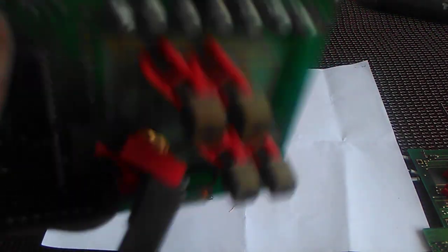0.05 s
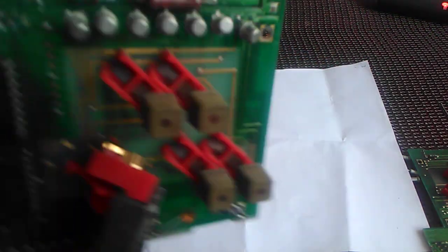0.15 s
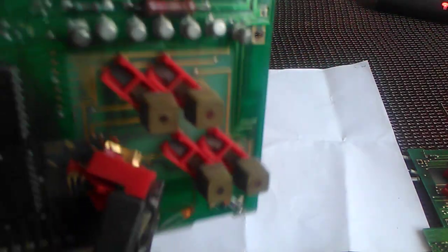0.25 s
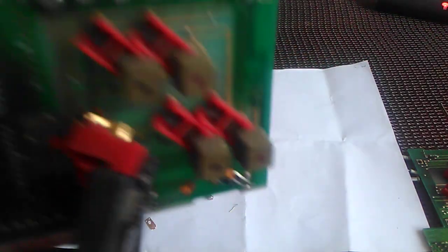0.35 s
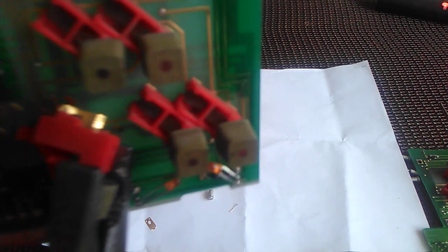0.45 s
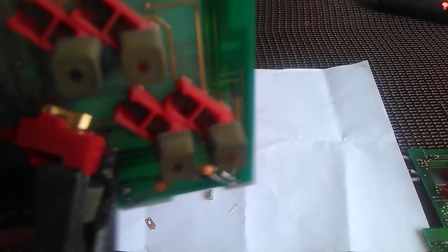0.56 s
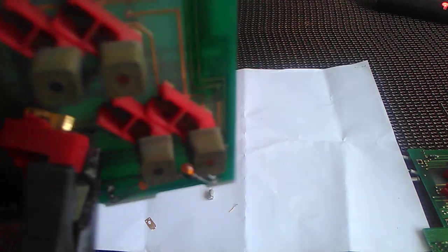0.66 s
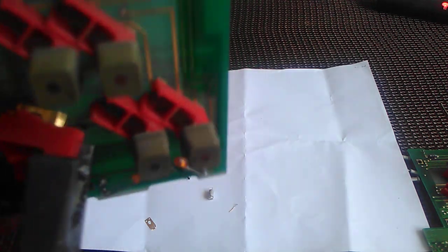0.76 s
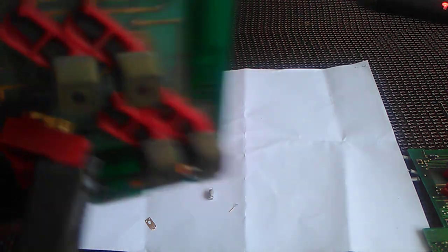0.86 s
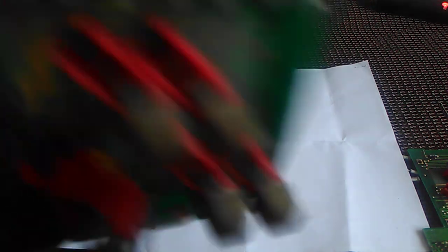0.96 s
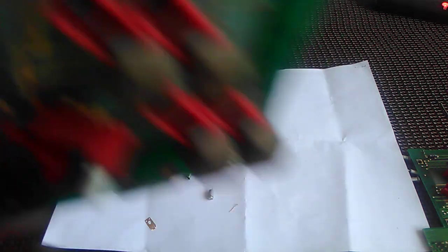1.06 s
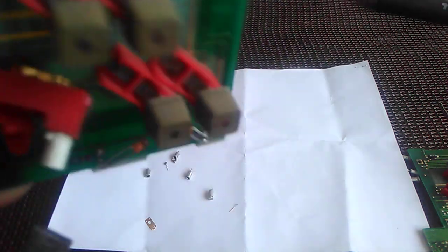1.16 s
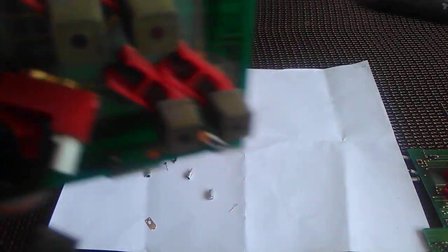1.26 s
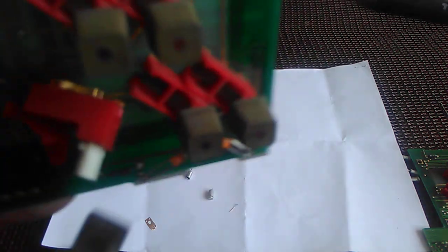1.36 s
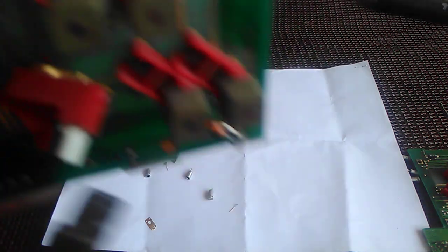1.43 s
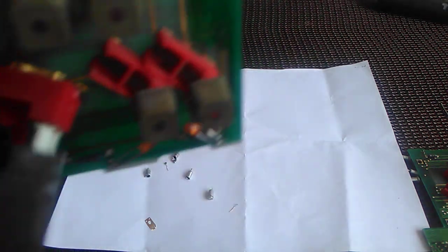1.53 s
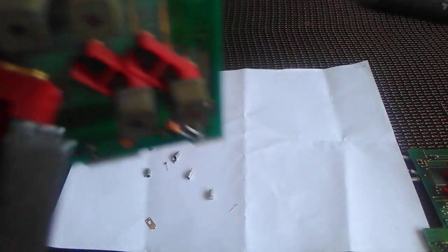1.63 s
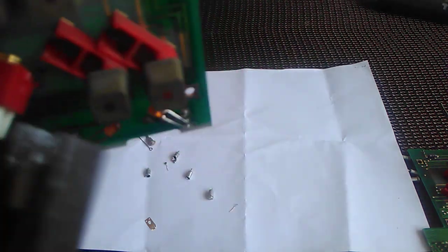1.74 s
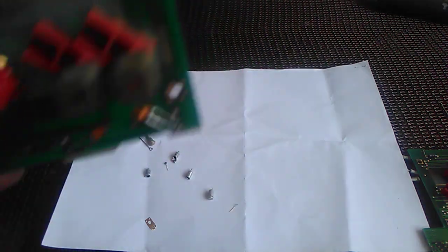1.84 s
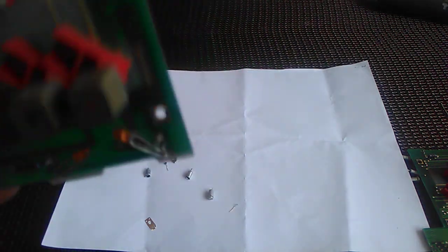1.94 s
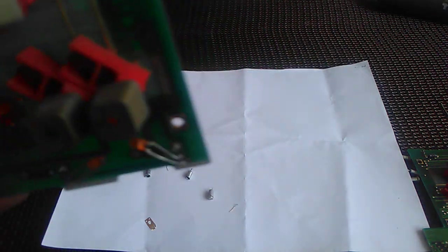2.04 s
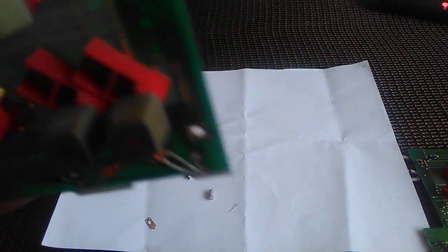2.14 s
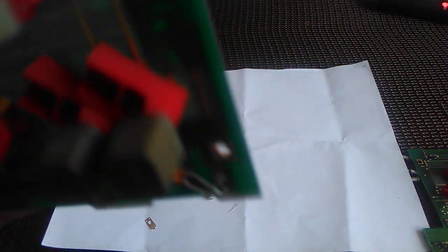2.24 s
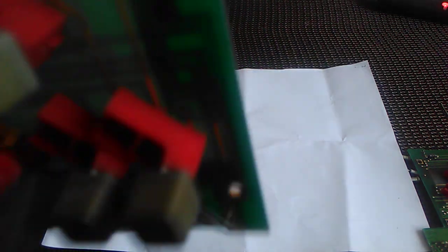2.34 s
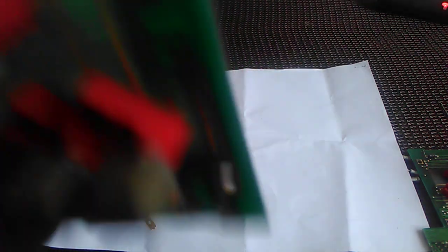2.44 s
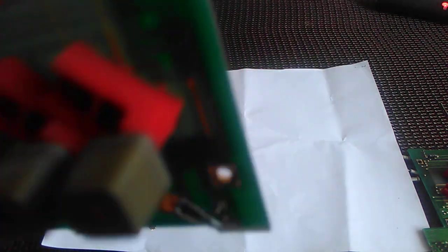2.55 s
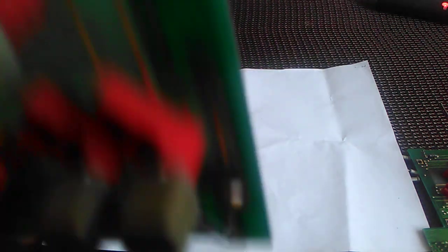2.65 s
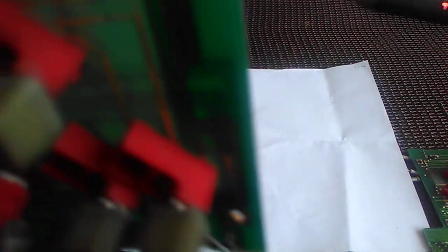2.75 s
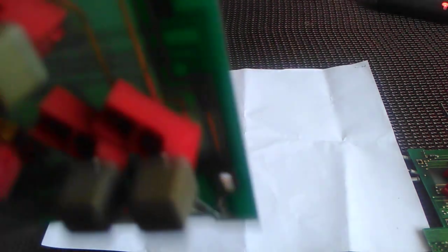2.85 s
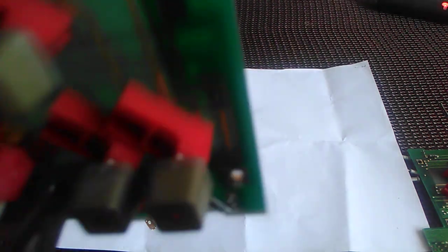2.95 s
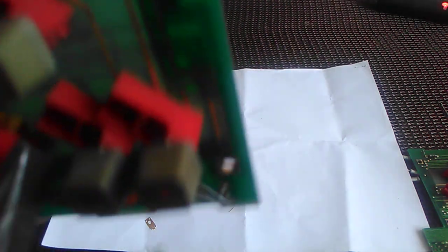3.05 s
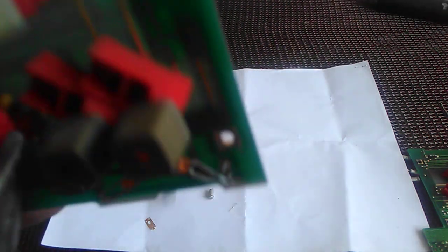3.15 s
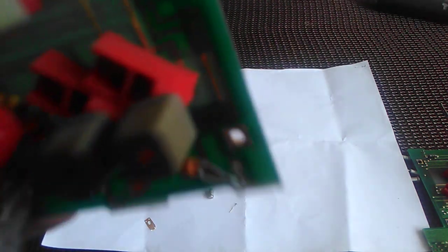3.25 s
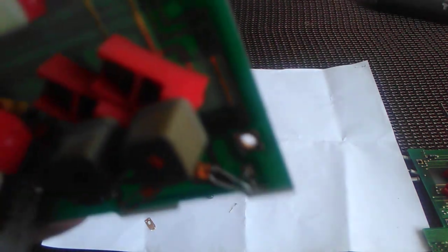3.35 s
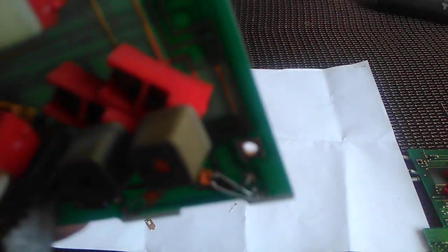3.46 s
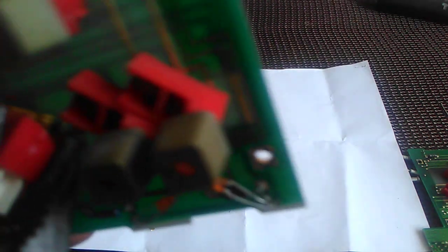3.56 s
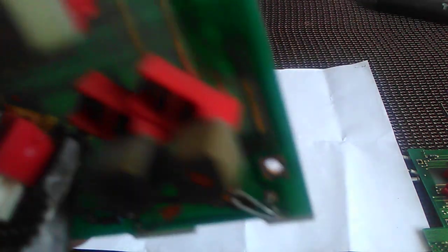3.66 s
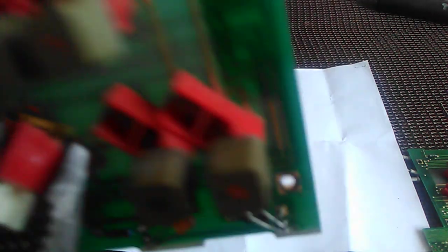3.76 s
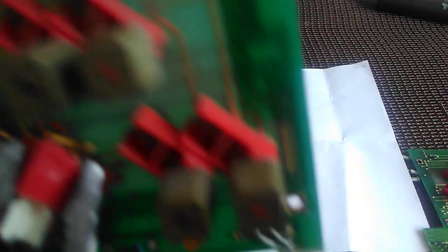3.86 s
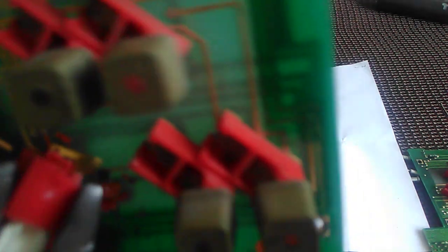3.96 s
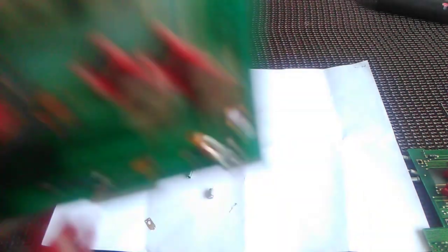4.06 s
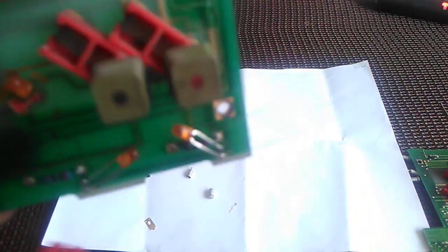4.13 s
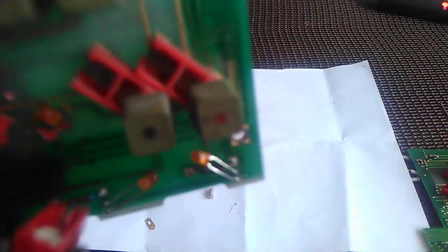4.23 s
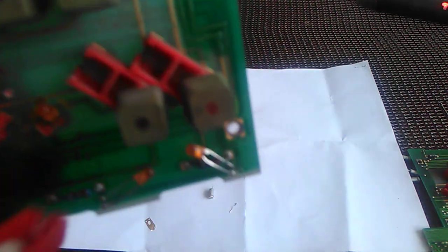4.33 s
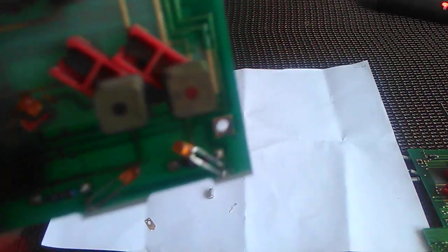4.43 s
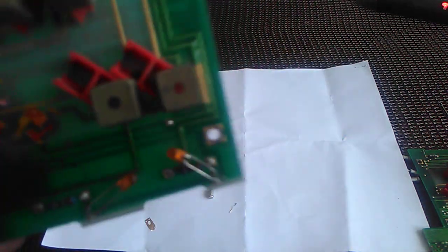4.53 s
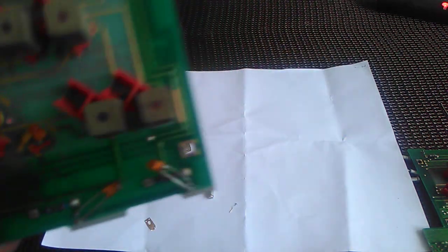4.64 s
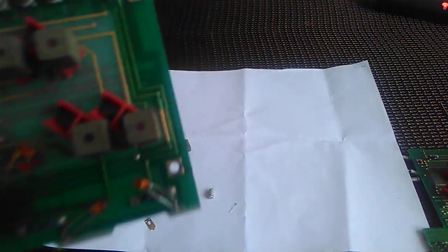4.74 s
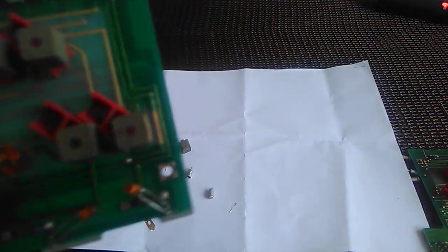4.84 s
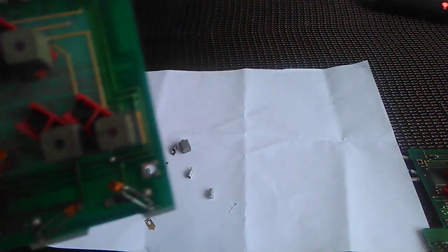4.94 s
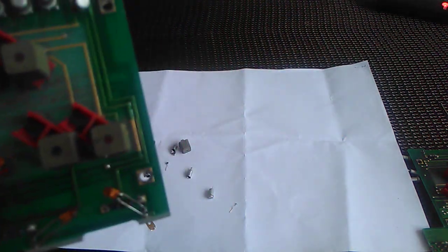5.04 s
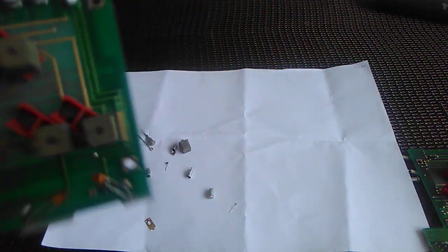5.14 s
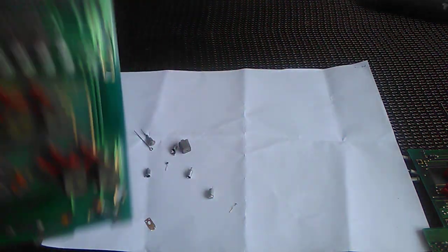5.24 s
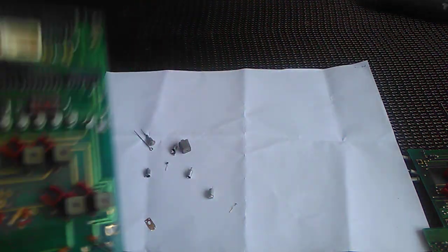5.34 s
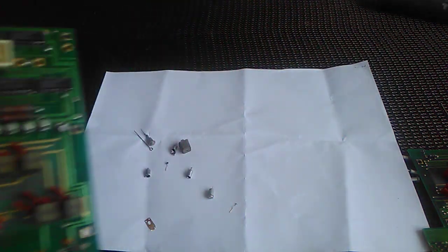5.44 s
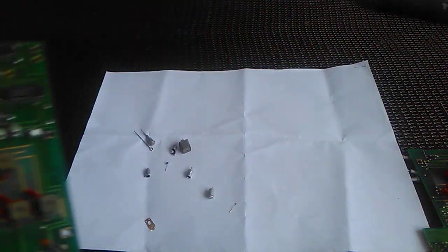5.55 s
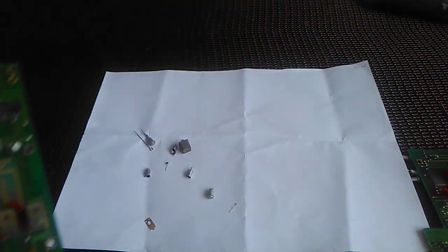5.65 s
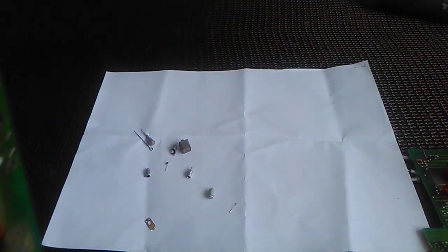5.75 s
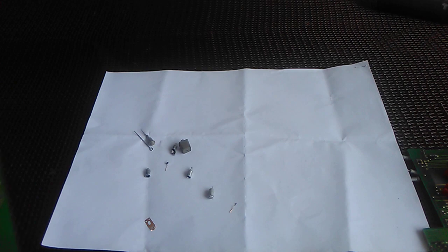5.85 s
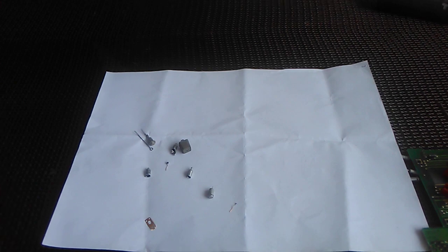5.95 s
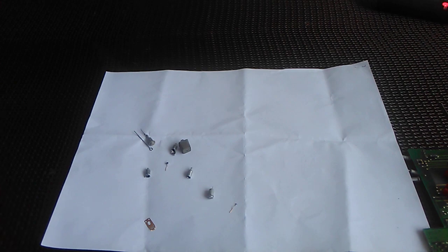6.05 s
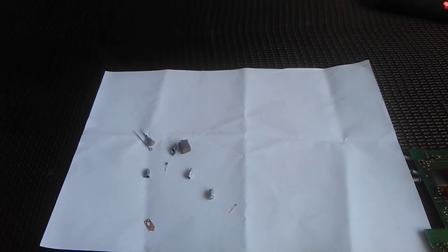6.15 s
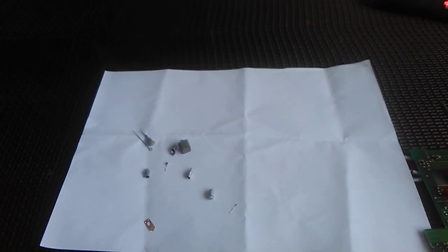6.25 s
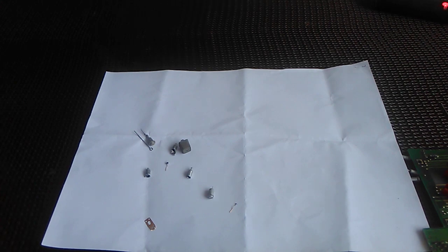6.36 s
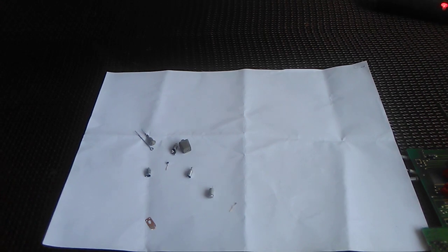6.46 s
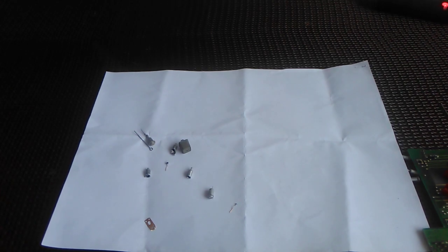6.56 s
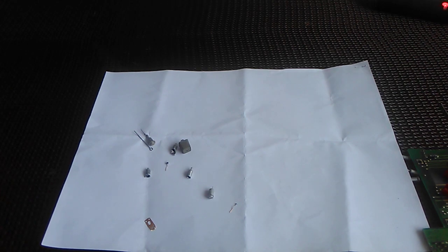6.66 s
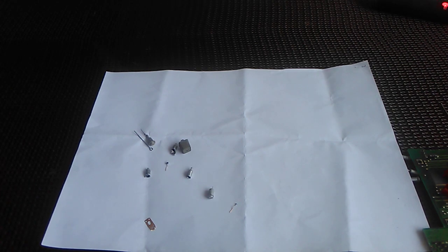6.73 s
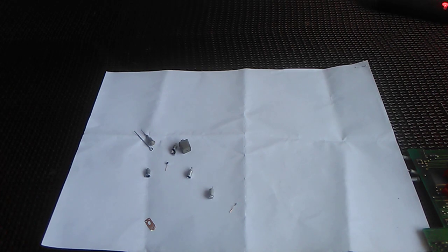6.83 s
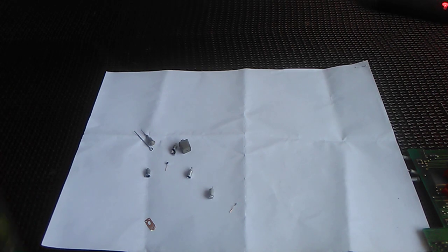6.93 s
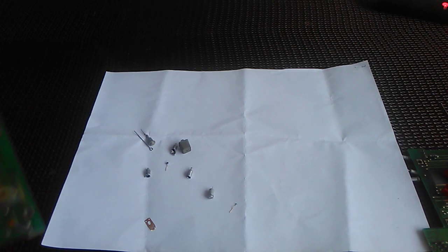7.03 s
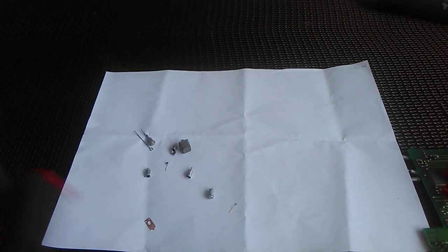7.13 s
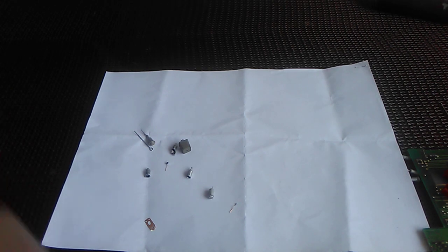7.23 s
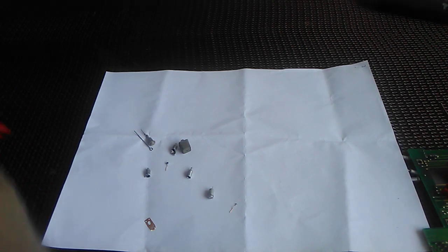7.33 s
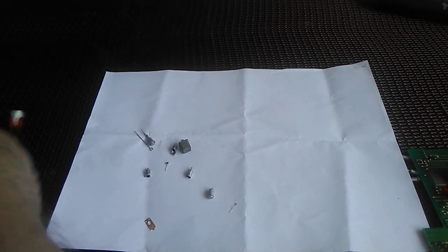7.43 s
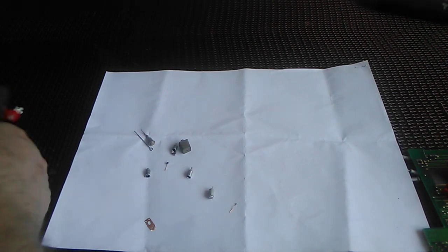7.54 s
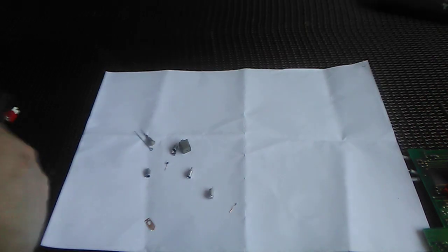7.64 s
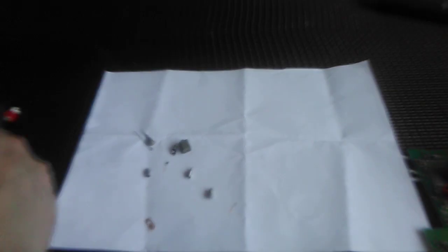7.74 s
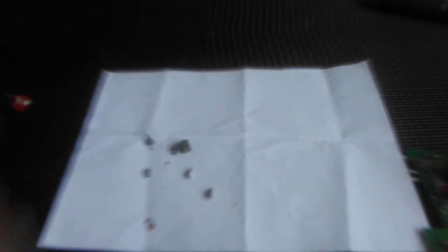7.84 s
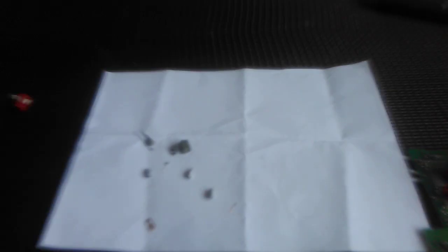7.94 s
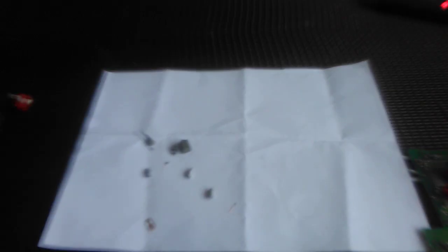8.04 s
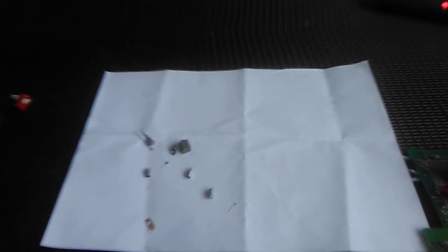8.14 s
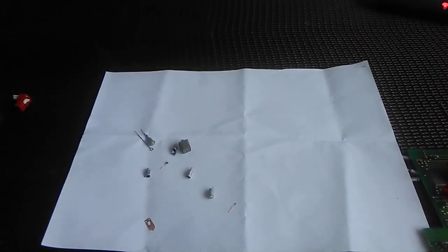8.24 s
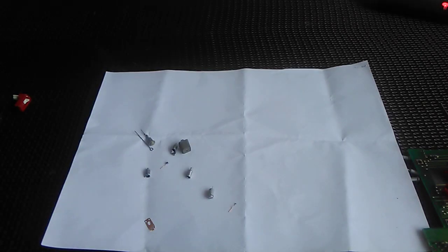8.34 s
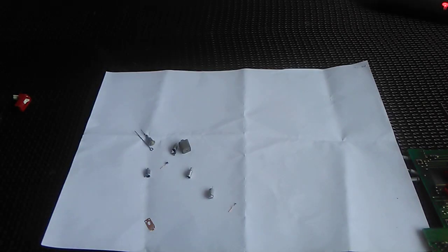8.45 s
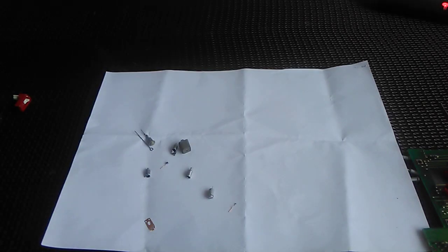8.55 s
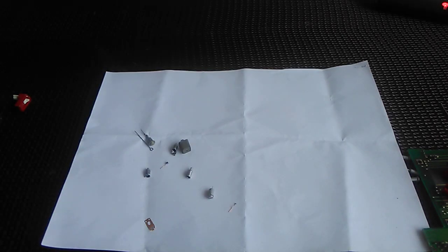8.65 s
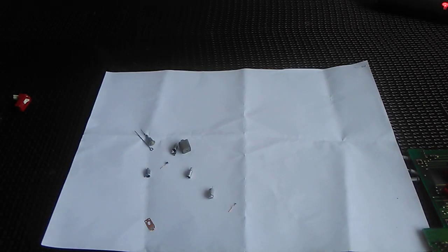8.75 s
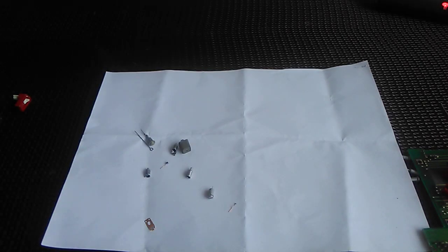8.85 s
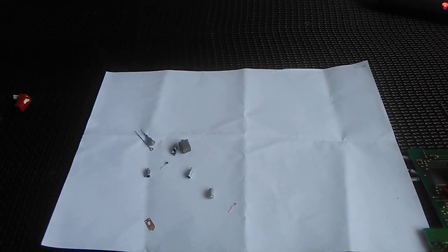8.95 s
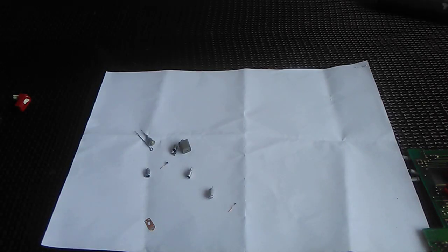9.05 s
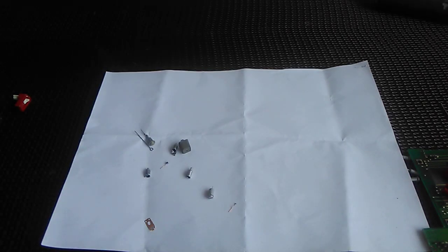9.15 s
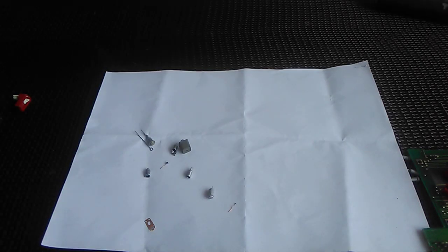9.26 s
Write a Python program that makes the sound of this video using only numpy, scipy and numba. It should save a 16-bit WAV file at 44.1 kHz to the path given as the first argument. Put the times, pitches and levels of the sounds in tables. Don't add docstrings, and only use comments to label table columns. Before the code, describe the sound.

Irregular hard snaps of breaking plastic, slightly overloaded and bright, come with gritty crunching, brief metal squeals and ringing small parts for over four seconds. A quieter spell of soft rubbing and light bumps follows. Then a circuit board lands with sharp clacks, deep hollow table knocks and loose chatter, and the small room falls nearly silent, heard close on a phone.

```python
import sys
import numpy as np
from scipy import signal
from scipy.fft import rfft, irfft
from scipy.io import wavfile
from scipy.ndimage import uniform_filter1d
from numba import njit

SR = 44100
rng = np.random.default_rng(int(sys.argv[2]) if len(sys.argv) > 2 else 0)


def elevation(decibels):
    levels = np.asarray(decibels, float)
    return 10 ** (levels / 20)


def to_wav(s):
    ch = np.atleast_2d(s).T
    pcm = np.round(np.clip(ch, -1, 1) * 32767)
    wavfile.write(sys.argv[1], SR, pcm.astype(np.int16))


N = 409688


def evened(x):
    return x / np.sqrt(np.mean(x ** 2) + 1e-20)


def read(points, hz):
    f, value = np.transpose(points)
    return np.interp(np.log(hz + 1), np.log(f + 1), value)


def add(mix, s, sound):
    part = mix[round(s * SR):][:len(sound)]
    part += sound[:len(part)]


def band(x, lo_hz, hi_hz):
    sos = signal.butter(3, [lo_hz, hi_hz], "bandpass", fs=SR, output="sos")
    return evened(signal.sosfilt(sos, x))


def narrow_band(x, hz, width):
    return band(x, hz * (1 - width / 2), hz * (1 + width / 2))


def resonate(x, hz, width_hz):
    return signal.lfilter(*signal.iirpeak(hz, hz / width_hz, SR), x)


@njit
def ring_out(out, at, size, turn, fade):
    for k in range(len(at)):
        for i in range(min(int(5 / fade[k]), len(out) - at[k])):
            out[at[k] + i] += size[k] * np.exp(-i * fade[k]) * np.sin(i * turn[k])
    return out


def grains(per_s, spread_db, lo_hz, hi_hz, cycles):
    when, pitch, length, luck = rng.random((int(per_s * N / SR), 4)).T
    hz = lo_hz * (hi_hz / lo_hz) ** pitch
    fade = hz / (SR * cycles * (0.048 + 1.8 * length))
    size = elevation(spread_db * np.minimum(-np.log(luck), 4)) * np.sqrt(fade)
    return evened(ring_out(np.zeros(N), (when * N).astype(np.int64), size, 2 * np.pi * hz / SR, fade))


def played(rows, *layers, swell_db=23.5):
    out, t = np.zeros(N), np.arange(SR) / SR
    for s, rise, db, t60, *colour_db in rows:
        swell = swell_db * np.maximum(1 - t / rise, 0)
        decay = 60 * np.maximum(t - rise, 0) / t60
        ends = np.minimum(t / .002, 1) * np.minimum(5 * (1 - t), 1)
        stroke = elevation(db - swell - decay) * ends
        mix = sum(elevation(off_db + share * sum(colour_db)) * np.resize(bed[round(s * SR):], SR)
                  for bed, off_db, share in layers)
        add(out, s, stroke * mix)
    return out


def struck(rows, sound, samples, **settings):
    out = np.zeros(N)
    for (s, *row), noise in zip(rows, rng.standard_normal((len(rows), samples))):
        add(out, s, sound(*row, noise, **settings))
    return out


def knock(db, hz, t60, noise, tone=1, spread=.7):
    t = np.arange(len(noise)) / SR
    fade = elevation(-60 * t / min(t60, .4)) * (1 - np.exp(-t * hz / .5)) ** 2
    width_hz = spread * hz
    puff = evened(resonate(resonate(noise, hz, width_hz), hz, width_hz))
    return elevation(db - 3.5) * fade * (tone * np.sin(2 * np.pi * hz * t) + .5 * puff)


def tick(db, hz, noise, ms=1.8):
    t = np.arange(len(noise)) / SR
    shape = (1 - np.exp(-t / .0001)) * np.exp(-t / (ms / 1000))
    burst = .5 * band(noise, 0.4 * hz, min(2.5 * hz, 16500))
    colour = .8 * evened(resonate(noise, hz, 0.083 * hz))
    return elevation(db - 6) * shape * (burst + colour)


def snap(db, hz, body_db, t60, noise, bright_db=0):
    t = np.arange(len(noise)) / SR
    t60 = min(t60, .35)
    rise = 1 - np.exp(-t / 0.00037)
    ring = 0.46 * evened(resonate(noise, hz, .24 * hz)) * elevation(-60 * t / (1.1 * t60))
    top_db = bright_db - 6 - 3.5 * np.log2(10 * t60)
    treble = 0.59 * band(noise, min(0.59 * hz, 4500), 11000) + elevation(top_db) * band(noise, 9800, 19000)
    treble = treble * elevation(-60 * t / t60)
    body = elevation(body_db + 5.0) * band(noise, 420, 2500) * elevation(-60 * t / (0.93 * t60))
    return elevation(db - 19.5) * rise * (ring + treble + body)


def background():
    # f/Hz, level/dB per Hz
    floor = [(41, -28), (70, -6.5), (107, -11.5), (369, -24), (505, -31.5), (1450, -34), (13700, -41),
             (15000, -53.5)]
    # t/s, level/dB
    hum_level = [(0.0, -60.5), (0.49, -61.5), (0.96, -53.5), (1.27, -50.5), (3.28, -48.5), (3.78, -79),
                 (4.04, -48), (4.45, -57.5), (4.68, -47), (4.79, -55), (5.64, -35.5), (5.85, -49),
                 (7.09, -51.5), (7.4, -61), (7.68, -52), (8.07, -49), (8.23, -54.5), (9.29, -50.5)]
    hz = np.fft.rfftfreq(N, 1 / SR)
    hiss = irfft(rfft(rng.standard_normal(N)) * elevation(read(floor, hz)) * (hz > 70), N)
    rumble = irfft(rfft(rng.standard_normal(N)) * (hz < 40) * (hz > 12), N)
    t = np.arange(N) / SR
    drift_hz = 1.7 * evened(uniform_filter1d(rng.standard_normal(N), 3000))
    waver = np.cumsum(drift_hz) / SR
    hum = np.sqrt(2) * np.sin(2 * np.pi * (50 * t + waver)) * elevation(np.interp(t, *np.transpose(hum_level)))
    return elevation(-60.5) * evened(hiss) + elevation(-60.0) * evened(rumble) + hum


def table():
    # f/Hz, width/Hz, level/dB
    modes = [(209, 14, -3), (269, 16, 10.5), (164, 19, -4), (430.3, 13, -0.5), (537, 29, -24.5),
             (743, 3.9, -5.5), (1210, 59, -25)]
    # t/s, rise/s, peak level/dB, t60/s
    shakes = [
        (4.038, .004, -36, 0.4),
        (7.697, .004, -14.5, .55),
        (7.766, 0.016, -19, 0.37),
        (7.905, 0.0056, -8, 0.66),
        (8.04, 0.046, -22.5, 0.21),
    ]
    # t/s, rise/s, peak level/dB, t60/s
    heaves = [(1.276, 0.052, -44, 0.41), (4.028, .004, -24.5, 0.27), (4.12, .03, -53.5, 1.2),
              (4.5, 0.21, -51.5, 0.83), (4.85, 0.13, -46, 0.96), (5.2, 0.078, -35, 0.74),
              (5.45, 0.18, -44.5, .3), (7.575, 0.0094, -40, 0.13), (7.701, .008, -21, 0.53),
              (7.72, 0.052, -22.5, 0.22), (7.84, 0.071, -17, 0.53), (7.98, .12, -23, 0.078)]
    jolts = elevation(1.5 * rng.exponential(1, N)) * (rng.random(N) < 300 / SR) * rng.choice([-1, 1], N)
    boom = sum(elevation(db) * evened(resonate(jolts, hz, width_hz)) for hz, width_hz, db in modes)
    boom = band(boom, 100, 1300)
    steady = boom / np.sqrt(uniform_filter1d(boom ** 2, 2500) + .01)
    noise = rng.standard_normal(N)
    heave = evened(resonate(noise, 104, 3.7)) + 0.76 * evened(resonate(noise, 110, 32))
    heave = evened(heave + 0.81 * band(noise, 49, 190))
    heave = evened(band(heave, 37, 250) + 0.24 * band(noise, 16, 56))
    return played(shakes, (steady, 0, 0)) + played(heaves, (heave, 0, 0))


def band_hisses():
    # t/s, rise/s, peak level/dB, t60/s, centre f/Hz
    hisses = [(0.966, 0.012, -39.5, .1, 8500), (1.116, 0.083, -45, 0.22, 9100),
              (7.88, 0.05, -45.5, .55, 12400), (2.782, 0.0066, -43, 0.22, 9200),
              (3.873, .01, -20.5, 0.23, 7200), (4.06, 0.076, -24, .25, 2900), (5.27, .11, -60, .15, 5500),
              (5.8, 0.027, -59.5, 0.31, 9900), (5.93, 0.043, -50, 0.16, 6900),
              (5.9, 0.16, -52.5, 0.21, 11000), (5.9, 0.031, -57, .2, 1800), (6.3, 0.038, -58.5, 0.36, 1500),
              (6.79, 0.12, -61, 0.24, 5560), (6.78, 0.125, -61.5, 0.36, 3200), (6.85, 0.063, -57, .2, 1400),
              (7.155, .01, -64.5, .4, 5000), (7.59, .02, -31, 0.3, 6500), (8.2, 0.069, -54, 0.35, 5600),
              (8.2, 0.059, -59, 0.22, 8200), (8.3, 0.12, -55, 0.87, 1400), (1.918, .04, -49, .12, 2300),
              (3.325, .03, -46, 0.043, 2620), (7.703, 0.027, -28, 0.18, 7000), (.66, 0.084, -30, .05, 9300),
              (4.045, .05, -32, 0.26, 1100), (7.72, 0.31, -43, .7, 4500), (1.025, .028, -30, .03, 1326),
              (3.455, .015, -44.5, .1, 5600)]
    noise = rng.standard_normal(N)
    return sum(played([row], (narrow_band(noise, hz, .25), 0, 0), swell_db=5) for *row, hz in hisses)


def sliding():
    # t/s, rise/s, treble peak level/dB, t60/s, weight/dB
    slides = [(5.18, 0.12, -67.5, 0.36, 23), (5.28, 0.075, -60, 1.2, 6), (5.635, 0.0092, -64, 0.86, 17.5),
              (5.82, 0.2, -47, 0.23, 2.5), (6.0, 0.078, -59.5, 0.65, 7), (6.1, 0.14, -65, 0.53, 13),
              (6.57, 0.11, -65, 0.25, 19), (6.7, 0.14, -58, 0.28, -11.5), (6.83, 0.056, -60, 0.56, 1.5),
              (7.15, 0.028, -65.5, 0.47, 7), (7.2, 0.12, -58.5, 0.16, -1), (7.32, 0.094, -40, 0.032, -11.5),
              (7.42, 0.0083, -32.5, 0.17, 6.5), (7.46, 0.019, -46.5, 1.2, 9.5),
              (7.58, 0.014, -32.5, 0.4, -20.5), (7.66, 0.055, -36, 1.46, 7), (7.895, 0.046, -40, 1.07, 13),
              (9.05, 0.085, -76, 0.77, 12.5), (9.19, 0.038, -54, 0.21, -16.5)]
    treble = grains(3500, 1.2, 5100, 12500, 9)
    middle = grains(3000, 1.5, 1200, 4000, 6)
    body = grains(900, 1.5, 250, 1200, 4)
    treble = evened(treble + 1.3 * resonate(treble, 6000, 3700))
    middle = band(middle + 1.37 * resonate(middle, 1300, 320), 610, 5900)
    body = band(body + 0.5 * resonate(body, 720, 80), 230, 1100)
    return played(slides, (treble, 0, 0), (middle, 0.7, 0.49), (body, 0, 1))


def bumps():
    # t/s, peak level/dB, ring f/Hz, t60/s
    touches = [(5.287, -23.5, 516, 0.044), (5.35, -17, 76, .1), (5.433, -37, 605, .06),
               (5.513, -39, 1500, 0.017), (5.817, -43.5, 711, 0.091), (5.944, -34, 590, 0.063),
               (6.085, -40, 700, .05), (6.225, -39, 693, 0.063), (7.722, -18.5, 743, 0.073),
               (7.74, -11, 480, 0.065), (7.772, -8, 269, .12), (7.792, -6.5, 209, .1),
               (7.826, -11, 269, 0.11), (7.928, -8.5, 480, 0.052), (7.945, -10, 743, 0.16),
               (7.962, -6.5, 432, 0.17), (7.99, -9, 840, 0.064), (7.996, -4.5, 193, .08),
               (8.006, -9.5, 522, 0.11), (8.063, -10, 292, 0.059), (8.084, -19, 284, 0.073),
               (8.122, -14.5, 267, 0.22), (9.074, -48.5, 805, 0.077), (9.122, -50, 1060, .05)]
    return struck(touches, knock, 14000)


def chatter():
    # t/s, peak level/dB
    rattling = [
        (7.7238, -15.5),
        (7.9184, -20),
        (7.9493, -23),
        (7.9788, -18),
        (8.0238, -19),
        (8.0536, -23.5),
        (8.086, -34),
        (8.1242, -25.5),
        (8.1612, -34.5),
    ]

    def contact(db, noise):
        high, low = knock(db + 2, 3630, 0.022, noise), knock(db - 6, 2710, 0.022, noise)
        return high + low + tick(db - 8, 7000, noise)

    return struck(rattling, contact, 2000)


def knocks():
    # t/s, peak level/dB, ring f/Hz, t60/s
    blows = [(0.367, -25, 312, 0.047), (1.047, -13.5, 1330, 0.047), (1.603, -21.5, 866, 0.11),
             (2.412, -16, 1437, 0.022), (7.702, -15, 1410, 0.059), (2.995, -1.5, 781, 0.045),
             (3.051, -21, 1754, 0.33), (3.12, -29, 520.6, 0.31), (4.011, -31.5, 1960, 0.23),
             (5.207, -27.5, 337.3, 0.047), (5.266, -8.5, 197, 0.029), (5.649, -27, 585, 0.053),
             (6.579, -30, 309.3, 0.055), (6.658, -37, 581, 0.053), (6.98, -28.5, 1494, 0.018),
             (7.169, -31, 520.6, 0.033), (7.427, -27, 574, 0.063), (7.586, -20.5, 1260, 0.039),
             (7.702, 3.5, 563, 0.053), (7.769, -20, 699, 0.04), (7.908, 3, 268, 0.031)]
    # t/s, peak level/dB, ring f/Hz, t60/s
    more_blows = [(4.168, -27, 1152, 0.06), (1.05, -22, 431, 0.049), (1.051, -23.5, 201.5, 0.064),
                  (1.602, -31, 257, 0.071), (2.414, -24, 419, 0.059), (2.995, -26, 190, 0.055),
                  (3.756, -34.5, 198.1, 0.023), (4.034, -14.5, 67.94, 0.13), (4.15, -31, 1760, 0.4),
                  (4.131, -27, 501.3, 0.28), (5.44, -31.5, 325, 0.072), (7.704, -6, 743, .16),
                  (7.81, -12, 214.7, 0.079), (7.897, -13, 4584, 0.016)]
    # t/s, peak level/dB, ring f/Hz, t60/s
    rasps = [
        (1.322, -50, 1465, .3),
        (1.6, -20, 589, .26),
        (6.985, -40, 1500, .39),
        (7.93, -8, 644, 0.41),
        (8.503, -36.5, 3010, 0.05),
    ]
    out = struck(blows, knock, 9000) + struck(more_blows, knock, 9000)
    return out + struck(rasps, knock, 12000, tone=.15, spread=.3)


def clacks():
    # t/s, peak level/dB, ring f/Hz
    edges = [
        (7.427, -7, 10500),
        (7.5002, -25, 8000),
        (7.587, 0.8, 6730),
        (7.7011, -4, 6040),
        (7.8096, -14.5, 11100),
        (8.0455, -18.5, 6200),
    ]
    return struck(edges, tick, 1500)


def shoves():
    # t/s, peak level/dB, pitch f/Hz
    pushes = [
        (3.757, -12.5, 2530),
        (3.8431, -23, 4500),
        (4.254, -13, 4520),
        (7.788, -5, 198),
        (4.024, -21, 45),
        (7.7665, -1.5, 170.2),
        (7.573, -27.5, 89),
    ]
    out = np.zeros(N)
    for s, db, hz in pushes:
        turn = np.arange(0, 1, hz / SR)
        add(out, s, -elevation(db + 0.5) * np.sin(np.pi * turn) * np.sin(2 * np.pi * turn))
    return out


def falling_bits():
    # t/s, peak level/dB, ring f/Hz
    clicks = [(.0034, -28, 9650), (.5505, -26.5, 9000), (.5616, -27, 9500), (.9684, -27.5, 8330),
              (1.6208, -17.5, 4300), (1.6797, -23, 2380), (1.916, -23, 4450), (1.9757, -39, 6500),
              (2.4723, -21, 2780), (2.5149, -17, 4030), (2.725, -18.5, 4700), (2.7673, -23.5, 2350),
              (2.7826, -18.5, 3430), (3.2293, -13, 6260), (3.278, -19, 7800), (3.327, -29, 2820),
              (3.8427, -16.5, 4370), (4.2541, -19.5, 4130), (4.5062, -23, 8540), (4.5361, -12, 7000),
              (4.6864, -30, 4500), (4.834, -36, 5860)]
    # t/s, peak level/dB, ring f/Hz, t60/s
    drops = [
        (4.2539, -12, 5340, 0.042),
        (4.505, -15.5, 6900, 0.15),
        (4.5365, -13, 8750, 0.3),
        (4.6828, -31, 7200, 0.24),
        (4.832, -28.5, 5970, 0.28),
    ]
    rattles = [(s, db, hz, -45, t60) for s, db, hz, t60 in drops]
    return struck(clicks, tick, 1500, ms=2.9) + struck(rattles, snap, 12000, bright_db=10)


def springs():
    # t/s, peak level/dB, ring f/Hz, t60/s
    coils = [
        (1.03, -39.5, 2610, 0.066),
        (1.064, -19.5, 4140, 0.21),
        (1.064, -12.5, 8700, 0.026),
        (1.064, -14.5, 10760, 0.034),
        (1.715, -29, 4150, 0.18),
        (3.03, -21, 14200, .15),
        (4.013, -25, 1994, 0.12),
    ]
    return struck(coils, knock, 14000, tone=.5, spread=.06)


def contacts():
    # f/Hz, level/dB, t60/s
    metal = [(2480, -1.5, 0.099), (2980, -4, 0.076), (4400, -5, 0.11), (6060, -2.5, 0.13), (8000, -1, 0.12),
             (8830, -7, 0.14)]
    out, t = np.zeros(N), np.arange(5000) / SR
    for s in (3.03, 3.089):
        wander = uniform_filter1d(rng.standard_normal((len(metal), len(t))), 150)
        flutter = 1 + 0.27 * evened(wander)
        ring = sum(elevation(db - 60 * t / t60) * f * np.sin(2 * np.pi * hz * t)
                   for (hz, db, t60), f in zip(metal, flutter))
        add(out, s, elevation(-15.5) * ring)
    return out


def squealing():
    # t/s, rise/s, peak level/dB, t60/s, pitch f/Hz
    squeals = [(.088, 0.0066, -26.5, 0.027, 6250), (.088, 0.014, -34.5, .04, 8200),
               (.09, 0.023, -44, 0.056, 4170), (.115, 0.015, -31, .03, 8230), (.128, 0.022, -33, .04, 6900),
               (.14, .012, -32, .04, 7950), (.148, 0.0094, -33.5, .03, 5370), (.66, .04, -30, .05, 6770),
               (.672, 0.053, -48.5, .05, 1090), (.7, 0.016, -32.5, .05, 5250), (.7, .03, -30, .05, 8640),
               (.7, .02, -45, .05, 3190), (.79, 0.028, -33, 0.067, 5480), (3.035, 0.042, -17, 0.066, 1768),
               (3.05, 0.031, -24, .08, 6060), (8.14, 0.033, -27.5, 0.39, 265.7)]
    noise = rng.standard_normal(N)
    return sum(played([row], (narrow_band(noise, hz, .03), 0, 0), swell_db=5) for *row, hz in squeals)


def pliers():
    # t/s, rise/s, treble peak level/dB, t60/s, bite/dB
    scrapes = [
        (.048, 0.076, -40, .08, -30),
        (.125, 0.036, -37.5, 0.04, -19),
        (.56, 0.02, -43.5, 0.081, -38),
        (.655, 0.089, -34, 0.056, -21),
        (.779, 0.028, -30, 0.1, -10),
        (.968, 0.0081, -44, 0.3, -9.5),
        (4.042, 0.04, -17.5, 0.34, -0.5),
    ]
    # t/s, rise/s, treble peak level/dB, t60/s, bite/dB
    crunches = [(1.02, 0.033, -38, 0.08, 7), (1.048, .008, -28, 0.045, -5), (1.07, .012, -39, 0.37, -2),
                (1.52, 0.036, -47.5, 0.27, -12), (1.584, 0.018, -39, 0.33, 2.5),
                (1.67, 0.0473, -30, 0.022, 2), (2.414, .005, -39, 0.31, -2.5),
                (2.46, 0.061, -36.5, 0.12, -1.5), (2.72, 0.081, -44.5, 0.27, 0.5),
                (2.989, .008, -16, 0.1, 1), (3.025, .005, -14.5, 0.47, -5), (3.276, .006, -35.5, 0.25, -44),
                (3.44, .065, -48.5, 0.091, -12), (4.24, 0.021, -34.5, 0.066, -34)]
    treble = band(grains(1500, 2.5, 4000, 8000, 16), 4400, 7600)
    top = grains(5400, 3.0, 8000, 22000, 18)
    middle = grains(3800, 3.5, 1500, 4000, 2.3)
    middle = band(middle + resonate(middle, 2900, 900), 1200, 3900)
    body = band(grains(2000, 3.1, 350, 1400, 3.9), 200, 2300)
    skating = played(scrapes, (treble, 0, 0), (top, 4.5, 0), (middle, 0, 1), (body, -11.5, 2.1), swell_db=1.5)
    crushing = played(crunches, (treble, 0, 0), (top, -4, 0), (middle, 0, 1), (body, -5.5, 2.1))
    return skating + crushing


def splinters():
    # t/s, peak level/dB, ring f/Hz
    slivers = [(1.0322, -34, 2640), (1.066, -6.5, 4500), (1.525, -48, 2610), (1.588, -25, 3920),
               (1.602, -33, 3000), (1.628, -20, 3500), (1.7, -17.5, 3000), (1.7173, -7, 6500),
               (2.7654, -28, 8570), (2.7838, -14.5, 10150), (3.7597, -7, 5760), (8.2, -39.5, 3572),
               (.3, -20.5, 6500), (9.218, -43.5, 6700), (.569, -43, 7000), (0.574, -35, 8000),
               (.581, -37, 7000), (.588, -34, 7500), (3.0898, -3.5, 8000), (3.22, -16, 7160),
               (3.2814, -24, 8000), (3.29, -23, 6000), (3.307, -29, 7000), (3.877, -0.5, 7100),
               (3.899, -11, 7200), (7.67, -22, 3970), (3.163, -11, 4500), (3.3924, -33, 7500),
               (9.152, -43, 3157), (4.6, -36, 6500), (7.79, -24, 13000), (7.9745, -20, 9500),
               (8.019, -28, 13000)]
    return struck(slivers, tick, 1500)


def breaking():
    # t/s, peak level/dB, ring f/Hz
    cracks = [(.2334, -0.5, 6560), (.6517, -5.5, 6870), (.741, -9, 5800), (1.053, -6.5, 5400),
              (1.0572, -9, 4800), (1.063, -1.5, 4090), (1.7135, -4.5, 4500), (2.4129, -12, 4980),
              (2.6354, -6.5, 4050), (2.996, -3, 3060), (3.031, 0.8, 4060), (3.0888, -0.5, 5300),
              (3.1452, -18.5, 4030), (3.1768, -0.5, 6350), (3.5219, -3.5, 3950), (3.5358, -7, 3540),
              (3.564, -13, 4500), (3.7565, -2.5, 4550), (3.8718, 4, 6870), (4.0137, -1.4, 6870),
              (4.0426, 2.5, 9800)]
    # t/s, peak level/dB, ring f/Hz, body under peak/dB, t60/s
    snaps = [(0.0034, -22.5, 10080, -17, 0.1), (0.2339, 11.5, 6015, -30.5, 0.071),
             (1.7148, -13.5, 4300, -13, 0.31), (1.915, -23.5, 5100, -29, 0.29), (2.633, -1, 4070, -4, 0.13),
             (3.3193, -11, 8193, -48, 0.14), (3.433, -29, 3600, -30, 0.25), (3.5215, 5.5, 3980, -30, 0.23),
             (3.7567, 4, 5300, -47, 0.21), (3.8727, 0, 6470, -21.5, 0.17), (4.0134, -10, 6585, -31, 0.072),
             (7.587, -10, 6800, -11, 0.42)]
    return struck(cracks, tick, 1500, ms=2.35) + struck(snaps, snap, 12000)


def room(x):
    # f/Hz, t60/s
    decay = [(300, 0.14), (790, 0.22), (2090, 0.1), (5510, 0.24)]
    taps = np.zeros(SR // 2)
    at = np.arange(120, len(taps) - 20, 20)
    taps[at + rng.integers(0, 20, len(at))] = rng.choice([-1., 1.], len(at))
    hz, t, z = signal.stft(taps, SR, nperseg=256)
    tail = signal.istft(z * elevation(-60 * t / read(decay, hz)[:, None]), SR, nperseg=256)[1]
    return signal.oaconvolve(x, tail / np.linalg.norm(tail))[:N]


def patchy(x):
    z = signal.stft(x, SR, nperseg=512, noverlap=384)[2]
    patches = rng.standard_normal(z.shape[::-1])
    patches = uniform_filter1d(uniform_filter1d(patches, size=10, axis=0), size=3, axis=1)
    return signal.istft(z * elevation(3 * evened(patches).T - 1), SR, nperseg=512, noverlap=384)[1][:N]


def gated(x):
    edges_hz = [0, 1200, 2000, 3000, 4000, 5000, 6200, 7600, 9500, 12000, 23000]
    open_db, knee_db, depth_db = -83, 5, -7.5
    hz, _, z = signal.stft(x, SR, nperseg=512, noverlap=384)
    which = np.searchsorted(edges_hz, hz, "right") - 1
    power = np.array([np.mean(abs(z[which == k]) ** 2, axis=0) for k in range(len(edges_hz) - 1)])
    level_db = 10 * np.log10(abs(uniform_filter1d(power, size=13)) + 1e-20)
    shut = .5 - .5 * np.tanh((level_db - open_db) / knee_db)
    return signal.istft(z * elevation(depth_db * shut)[which], SR, nperseg=512, noverlap=384)[1][:N]


def scene():
    hits = knocks() + clacks() + falling_bits() + contacts() + breaking()
    jaws = pliers()
    echo = elevation(-7.5) * room(hits + jaws)
    near = hits + band_hisses() + sliding() + bumps() + chatter()
    near = near + shoves() + springs() + squealing() + splinters()
    mono = gated(near + patchy(jaws + echo)) + table() + background()
    return np.array([mono, mono])


def top_cut(x):
    return signal.sosfilt(signal.butter(12, 15690, fs=SR, output="sos"), x)


def record(dry):
    # f/Hz, side minus mid level/dB
    side_level = [(3000, -60), (3900, -45), (4400, -17), (5500, -11), (8000, -8), (14000, -6)]
    low_pass = signal.firwin(401, 14350, window=("kaiser", 9), fs=SR)
    mid = signal.oaconvolve(np.clip(dry[0], -.74, .74), low_pass, "same")
    hz, _, z = signal.stft(mid, SR, nperseg=256)
    chance = np.exp(2j * np.pi * rng.random(z.shape[::-1]).T)
    z = z * elevation(read(side_level, hz))[:, None] * chance
    side = 1.25 * signal.istft(z, SR, nperseg=256)[1][:N]
    side = signal.sosfilt(signal.butter(8, 4100, "highpass", fs=SR, output="sos"), side)
    return top_cut(np.array([mid + side, mid - side]))


dry = scene()
out = record(dry)
to_wav(out)
```